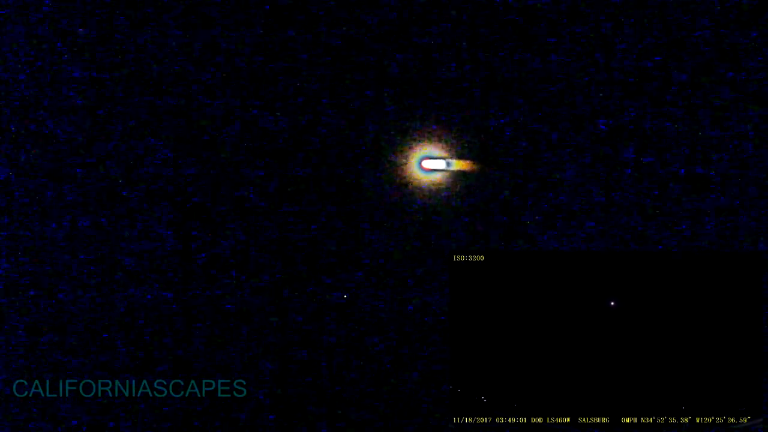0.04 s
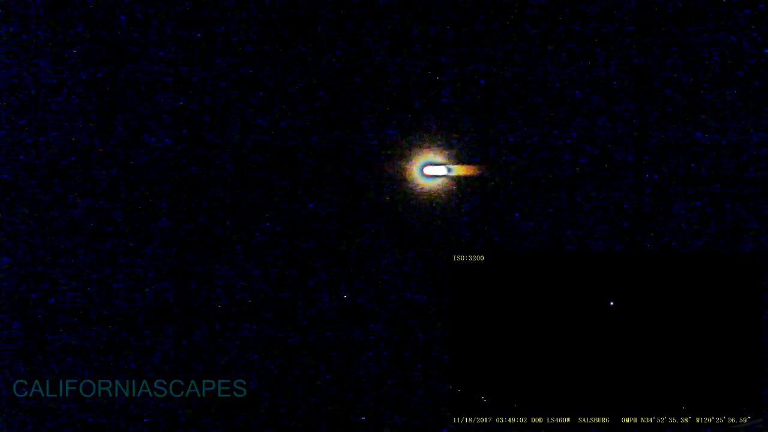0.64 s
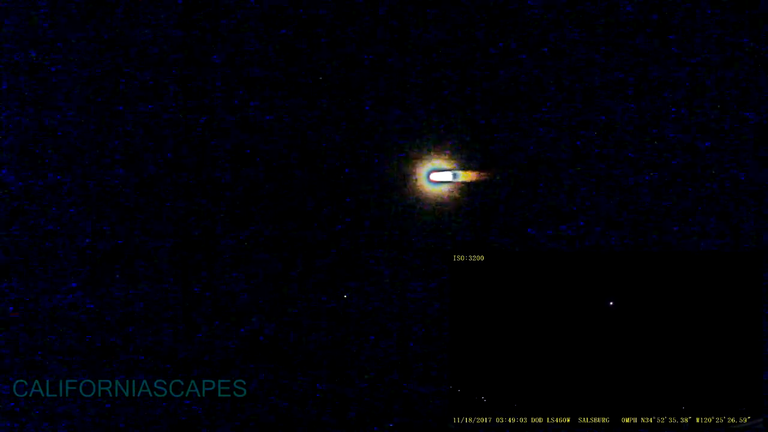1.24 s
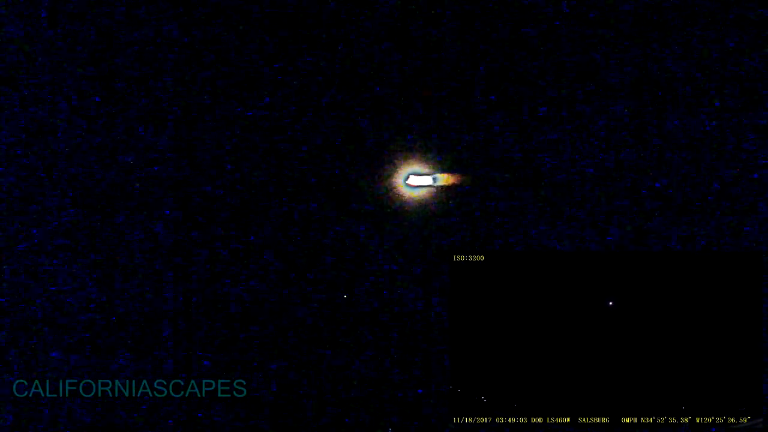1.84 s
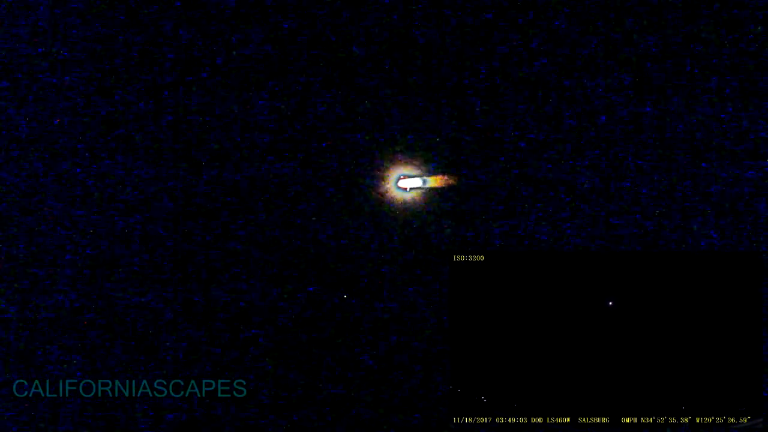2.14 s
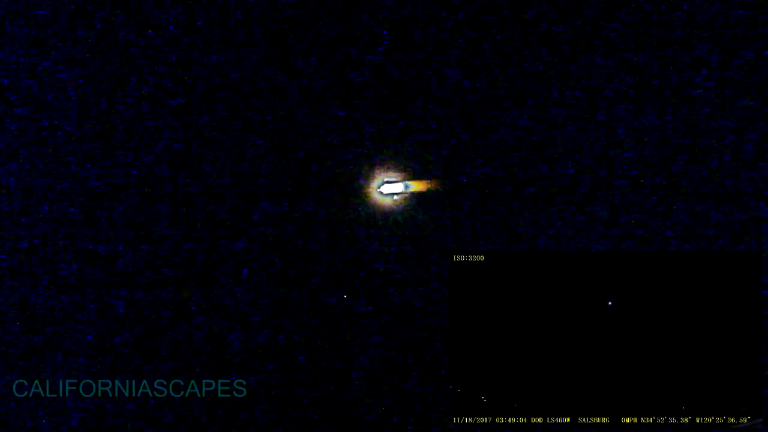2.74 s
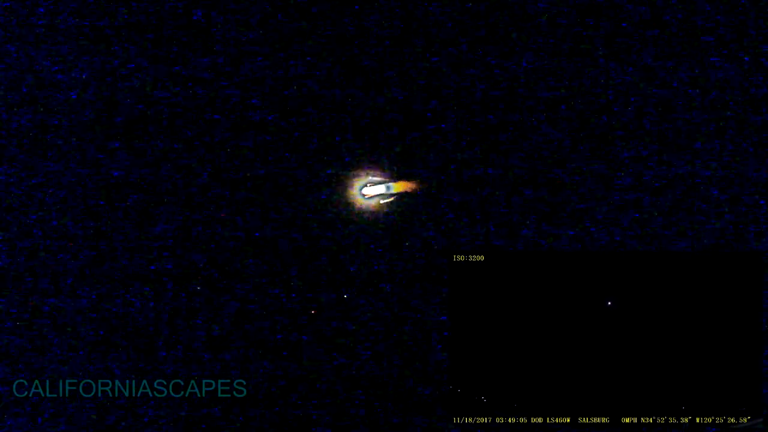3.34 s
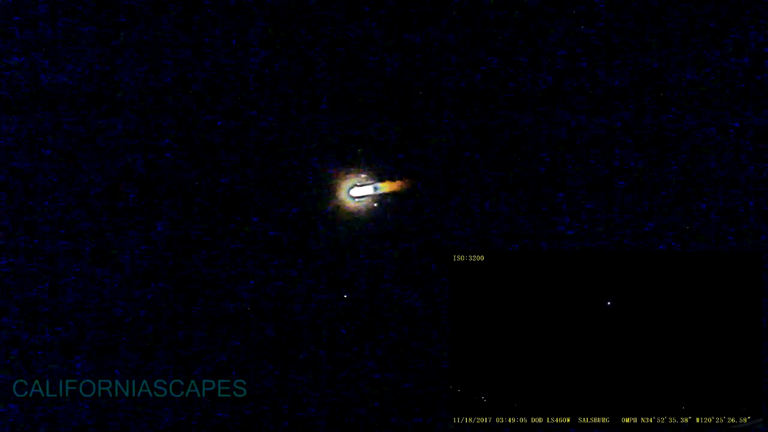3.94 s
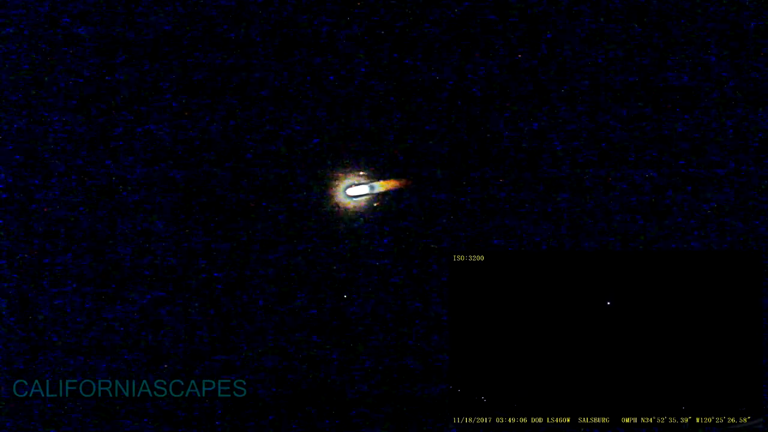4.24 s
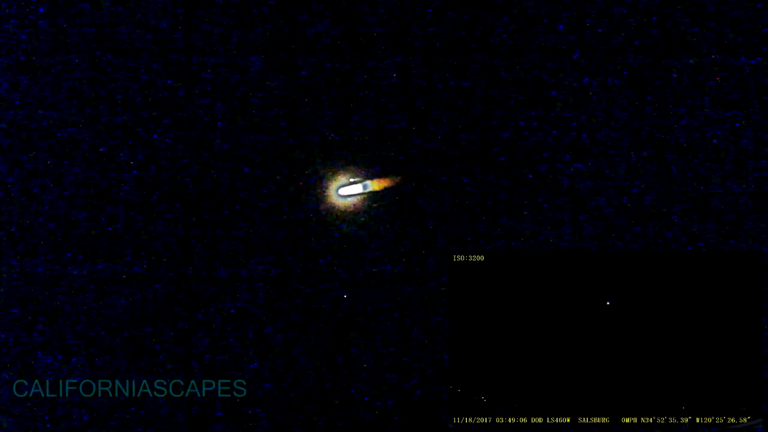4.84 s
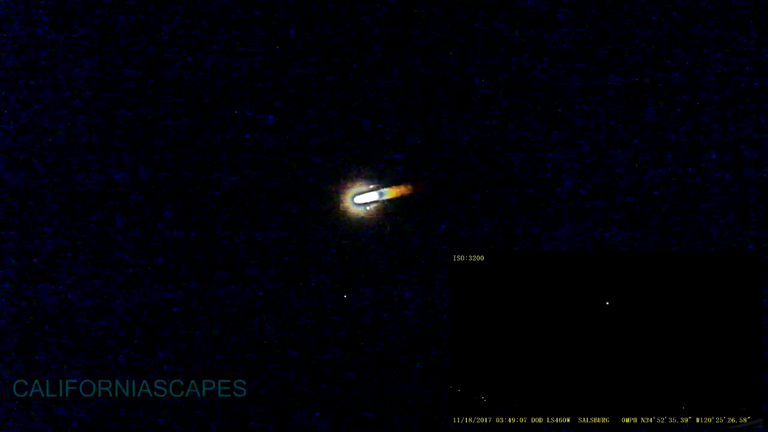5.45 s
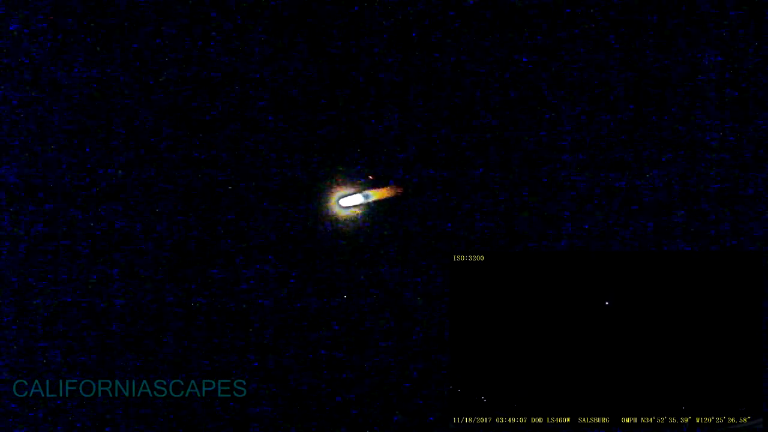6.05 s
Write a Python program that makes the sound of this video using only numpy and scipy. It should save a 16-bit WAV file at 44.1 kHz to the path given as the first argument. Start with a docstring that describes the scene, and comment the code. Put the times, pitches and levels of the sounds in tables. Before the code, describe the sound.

A rocket climbs away far off in the night, its deep, muffled roar surging and throbbing, then slowly fading and leaning a little to the left. Behind it, distant traffic washes faintly in and out, with tyres singing two breathy notes and a weak machine hum, mostly on the left. Two spaced outdoor microphones add a soft steady hiss and a thin high whine.

```python
"""Far rocket at night

A rocket climbs away, and its low, throbbing roar slowly fades; the air has soaked up its high notes.
Distant traffic washes in and out, with singing tyres, a faint machine hum and a faint high ringing.
Two microphones stand metres apart: the roar reaches the left first, and each adds hiss and a thin whine."""
import sys
import numpy as np
from scipy.fft import rfft, irfft, next_fast_len
from scipy.io import wavfile
from scipy.ndimage import uniform_filter1d

SR = 44100
rng = np.random.default_rng(int(sys.argv[2]) if len(sys.argv) > 2 else 0)


def store_pcm(level_fs):
    """Save levels as 16-bit WAV."""
    pcm = np.round(np.clip(level_fs, -1, 1) * 32767).astype(np.int16)
    wavfile.write(sys.argv[1], SR, np.atleast_2d(pcm).T)


N = 273861


def seconds():
    """The time of every sample."""
    return np.arange(N) / SR


def from_db(db):
    """Turn decibels into a number to multiply the sound by."""
    return 10 ** (np.asarray(db) / 20)


def rms_one(x):
    """Scale each channel to an average strength (rms) of 1."""
    return x / np.sqrt(np.mean(x ** 2, axis=-1, keepdims=True) + 1e-20)


def bell(peak_s, half_s):
    """A smooth bump of height 1, down to about a third at half_s either side of its peak."""
    return np.exp(-((seconds() - peak_s) / half_s) ** 2)


def at_hz(rows, hz):
    """Read a table at any frequency, joining its rows by straight lines on a pitch scale."""
    points, *columns = np.transpose(rows)
    return np.array([np.interp(np.log(np.maximum(hz, 1)), np.log(points), c) for c in columns])


def filtered(x, response):
    """Turn each frequency f of a sound up or down by response(f)."""
    size = next_fast_len(N + SR // 2, real=True)
    return irfft(rfft(x, size) * response(np.fft.rfftfreq(size, 1 / SR)), size)[..., :N]


def white():
    """Separate white noise for left and right, with spare length for filtering."""
    return rng.standard_normal((2, next_fast_len(N + SR // 2, real=True)))


def coloured_noise(colour):
    """Separate noise for left and right, its tone shaped by a table; strength 1."""
    return rms_one(filtered(white(), lambda f: from_db(at_hz(colour, f))))


def narrow_noise(hz, width_hz):
    """Separate noise for left and right, ringing around one pitch; strength 1."""
    return rms_one(filtered(white(), lambda f: 1 / (1 + ((f - hz) / width_hz * 2) ** 2)))


def drift(rate_hz):
    """A slow random wander around zero; strength 1."""
    return rms_one(filtered(white()[0], lambda f: (f > 0) / (1 + (f / rate_hz) ** 4)))


def split(x, hz):
    """The parts of a sound below and above a frequency."""
    low = filtered(x, lambda f: 1 / (1 + (f / hz) ** 20))
    return low, x - low


def steady(x, span_s):
    """Even out any swells slower than span_s; strength 1."""
    size = max(int(span_s * SR), 2)
    power = uniform_filter1d(uniform_filter1d(np.mean(x ** 2, axis=0), size), size)
    return rms_one(x / np.sqrt(np.maximum(power, 0) + 1e-9))


# tone of the hiss: (frequency [Hz], left relative level [dB], right relative level [dB])
HISS_COLOUR = [(200, -5, -5), (1920, -1, 1.5), (4000, -4, -1), (6000, -6.5, -2), (8900, -9.5, -3.5),
               (12000, -10, -5.5), (14000, -8.5, -8), (15600, -13, -8.5)]
# electronic whines: (pitch [Hz], left relative level [dB], right relative level [dB])
WHINE_TONES = [(9519, -95, -58.5), (15692, -81, -110)]
def electronics(start_db=3.0, fade_db_per_s=0.9, waver_db=1.4):
    """The microphones' amplifiers hiss, and their thin whines waver and slowly weaken."""
    t = seconds()
    whines = 0
    for hz, left, right in WHINE_TONES:
        tone = np.sqrt(2) * np.sin(2 * np.pi * (hz * t + rng.random()))
        fuzz = from_db(-12) * narrow_noise(hz, width_hz=170)
        whines = whines + from_db([[left], [right]]) * (tone + fuzz)
    whine_db = start_db - fade_db_per_s * t + waver_db * drift(rate_hz=3.0)
    hiss = from_db([[-51], [-49.5]]) * coloured_noise(HISS_COLOUR)   # left, right
    return hiss + from_db(whine_db) * whines


def high_ringing(left_db=-60.5, right_db=-76):
    """A faint, steady, high ringing noise, mostly on the left."""
    return from_db([[left_db], [right_db]]) * narrow_noise(hz=3260, width_hz=230)


# machine tones: (pitch [Hz], left relative level [dB], right relative level [dB])
HUM_TONES = [(305, -57, -70), (448, -54.5, -63), (657, -52.5, -68), (872, -53, -70), (1545, -71, -85),
             (1764, -65, -85)]
def machine_hum(lull_db=-5, swell_db=6):
    """A machine's wavering tones carry best for a few seconds."""
    tones = 0
    for hz, left, right in HUM_TONES:
        tone = steady(narrow_noise(hz, width_hz=5.3), span_s=0.42)
        tones = tones + from_db([[left], [right]]) * tone
    return from_db(lull_db + swell_db * bell(peak_s=2.4, half_s=2.0)) * tones


# tone of far tyres: (frequency [Hz], left relative level [dB], right relative level [dB])
TYRE_COLOUR = [(150, -6, -7), (343, -5.5, -1.5), (440, -2.5, -2), (524, -1.5, -5), (754, 1.5, -1.5),
               (870, -2.5, -1), (1073, -4.5, -8.5), (1230, -10, -7.5), (1530, -12.5, -14.5),
               (1650, -14.5, -11.5), (2050, -28.5, -19), (2970, -30, -22.5), (6000, -73, -37)]
# passing vehicles: (time when nearest [s], time to half power [s], left level [dB], right level [dB])
VEHICLE_PASSES = [(0.0, 0.34, -38.5, -41.5), (1.15, 0.34, -46.5, -45), (1.85, 0.5, -41, -46.5),
                  (2.95, 0.43, -45.5, -64), (3.9, 0.16, -54, -49), (4.25, 0.12, -39, -49.5),
                  (4.77, 0.16, -37, -50.5), (5.55, 0.79, -40.5, -47.5)]
def traffic(roads_left_db=-42.5, roads_right_db=-48.5):
    """Tyre noise, dulled by distance: each vehicle swells and fades over the steady wash of far roads."""
    power = from_db([[roads_left_db], [roads_right_db]]) ** 2
    for nearest_s, half_s, left, right in VEHICLE_PASSES:
        distance_squared = 1 + ((seconds() - nearest_s) / half_s) ** 2   # 1 when nearest
        power = power + from_db([[left], [right]]) ** 2 / distance_squared
    return np.sqrt(power) * coloured_noise(TYRE_COLOUR)


# pitches in the tyres' low note: (pitch [Hz], width [Hz], relative level [dB])
LOW_NOTE_PITCHES = [(657, 21, -7), (712, 100, -1)]
# singing tyres: (time when loudest [s], half length [s], low note [dB], high note [dB],
# right minus left [dB])
SINGING_PASSES = [(1.45, 0.44, -50, -44, -16), (2.1, 0.4, -42.5, -45.5, -27),
                  (2.163, 0.077, -55, -34.5, -19), (2.976, 0.82, -39.5, -43, -25),
                  (4.16, 0.4, -44, -55, -6), (4.745, 0.24, -43, -42, -8)]
def tyre_song():
    """Tyre treads sing two breathy notes as vehicles pass far off, mostly on the left."""
    low_power = high_power = 0
    for peak_s, half_s, low_db, high_db, right_db in SINGING_PASSES:
        swell = bell(peak_s, half_s) * from_db([[0], [right_db]])
        low_power = low_power + (from_db(low_db) * swell) ** 2
        high_power = high_power + (from_db(high_db) * swell) ** 2
    low_ring = sum(from_db(db) * narrow_noise(hz, width) for hz, width, db in LOW_NOTE_PITCHES)
    low_note = steady(low_ring, span_s=0.054)
    high_note = steady(narrow_noise(hz=858, width_hz=75), span_s=0.1)
    return np.sqrt(low_power) * low_note + np.sqrt(high_power) * high_note


# tone of the roar: (frequency [Hz], left relative level [dB], right relative level [dB])
RUMBLE_COLOUR = [(8.1, -54, -29), (14.5, -8, -6), (21.34, -2, -4.5), (35, 6.5, 10), (52.2, -2.5, 2.5),
                 (74.3, 2.5, -7.5), (89.5, -0.5, -3.5), (97.3, 0, -10), (134, -8.5, -10.5), (166, -14, -20),
                 (231, -28, -31.5), (287, -32, -47), (500, -57, -51), (900, -78, -77)]
# how alike the roar is at the two microphones: (frequency [Hz], likeness [0 to 1])
RUMBLE_LIKENESS = [(20, 0.77), (55, 0.85), (100, 0.48), (150, 0.85), (220, 0.4), (300, 0.65)]
def rumble(lag_s=0.01038, turn_radians=0.94):
    """Low noise that reaches the right microphone later, partly scrambled and with its waves shifted."""
    noise = white()
    hz = np.fft.rfftfreq(noise.shape[1], 1 / SR)
    left, unrelated = rfft(noise)
    likeness = np.clip(at_hz(RUMBLE_LIKENESS, hz)[0], 0, 1)
    right = likeness * left + np.sqrt(1 - likeness ** 2) * unrelated
    delay = np.exp(-1j * (2 * np.pi * hz * lag_s + turn_radians))
    spectrum = np.array([left, right * delay]) * from_db(at_hz(RUMBLE_COLOUR, hz))
    return rms_one(irfft(spectrum)[:, :N])


# booming notes in the roar's middle part: (pitch [Hz], width [Hz], level against that part [dB])
BOOM_NOTES = [(75.65, 7.7, -7.5), (84.2, 8.3, -15)]
# quick surges and dips of the middle part: (time [s], half length [s], level change [dB])
MIDDLE_SURGES = [(0.045, 0.02, 6), (0.315, 0.022, 6), (0.456, 0.046, -10), (0.529, 0.027, 10),
                 (0.594, 0.03, -10.5), (0.804, 0.016, -15), (1.2, 0.052, 5), (1.6, 0.033, -5),
                 (1.787, 0.023, -7), (1.894, 0.046, 4), (2.205, 0.069, 3), (2.69, 0.26, -3),
                 (3.296, 0.2, 1.5), (4.07, 0.06, 3.5), (4.544, 0.015, 10.5)]
# slow swells and dips around it: (time [s], half length [s], deep change [dB], upper change [dB])
SLOW_SWELLS = [(0.24, 0.15, -2, -0.5), (1.036, 0.13, 5, 2), (1.46, 0.25, 4, -1), (3.54, 0.22, 3.5, -0.5),
               (4.057, 0.45, 2, 1)]
def rocket_roar(distance_doubled_s=1.58, throb_db=1.5, waver_db=0.5, leftward_db_per_s=0.74):
    """The rocket's churning exhaust surges and throbs, fading with distance and drifting to the left."""
    t = seconds()
    to_left = np.array([[1], [-1]])   # left up, right down
    deep, rest = split(rumble(), hz=54.6)
    middle, upper = split(rest, hz=108.4)
    # one wave of a boom lasts about the lag between the microphones, so both sides swing together
    booms = sum(from_db(db) * narrow_noise(hz, width)[0] for hz, width, db in BOOM_NOTES)
    middle = rms_one(middle) + booms

    surge_db = sum(db * bell(s, half) for s, half, db in MIDDLE_SURGES)
    throb = narrow_noise(hz=8.57, width_hz=5.0)[0]
    deep_swell_db, upper_swell_db = sum(np.outer(dbs, bell(s, half)) for s, half, *dbs in SLOW_SWELLS)
    # each part loses a set number of decibels whenever the distance grows tenfold
    tenfolds = np.log10(1 + t / distance_doubled_s)
    deep_db = -18.5 - 15.5 * tenfolds + deep_swell_db
    middle_db = -12.5 - 21 * tenfolds + surge_db + throb_db * throb
    upper_db = -21 - 20 * tenfolds + upper_swell_db - waver_db * drift(rate_hz=2.7)

    deep = from_db(deep_db) * steady(deep, span_s=0.39)
    middle = from_db(middle_db) * steady(middle, span_s=0.14)
    upper = from_db(upper_db + 0.8 * to_left) * steady(upper, span_s=0.28)
    lean_left = from_db(leftward_db_per_s * t / 2 * to_left)
    return deep + (middle + upper) * lean_left


def scene():
    """Everything that the two microphones pick up."""
    return rocket_roar() + traffic() + tyre_song() + machine_hum() + high_ringing() + electronics()


def record(dry):
    """Round off the biggest peaks just under full scale, then cut away the very highest treble."""
    cutoff_hz = 15740
    rounded = dry / (1 + dry ** 10) ** (1 / 10)
    return filtered(rounded, lambda f: 1 / (1 + (f / cutoff_hz) ** 600))


dry = scene()
out = record(dry)
store_pcm(out)
```